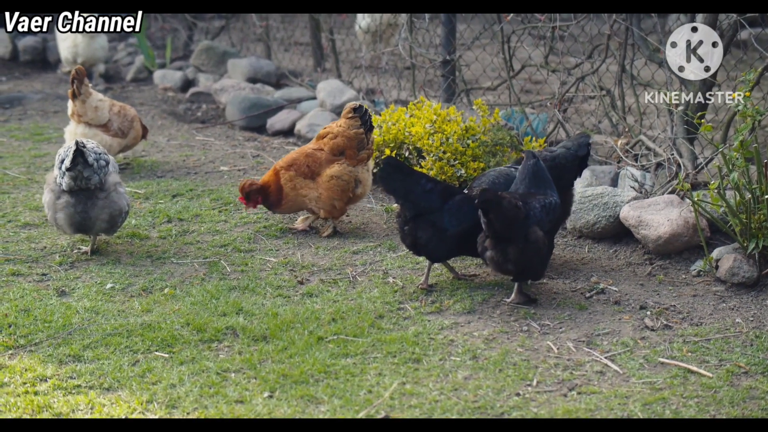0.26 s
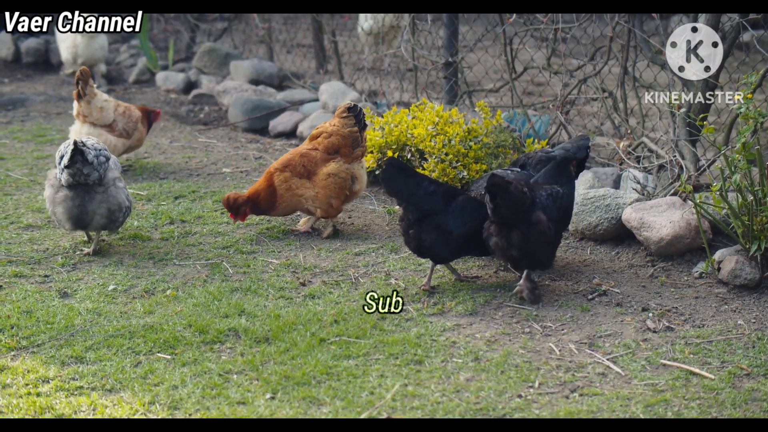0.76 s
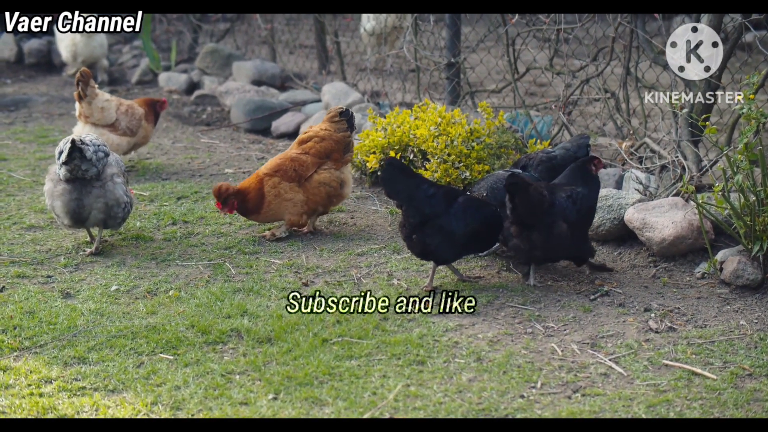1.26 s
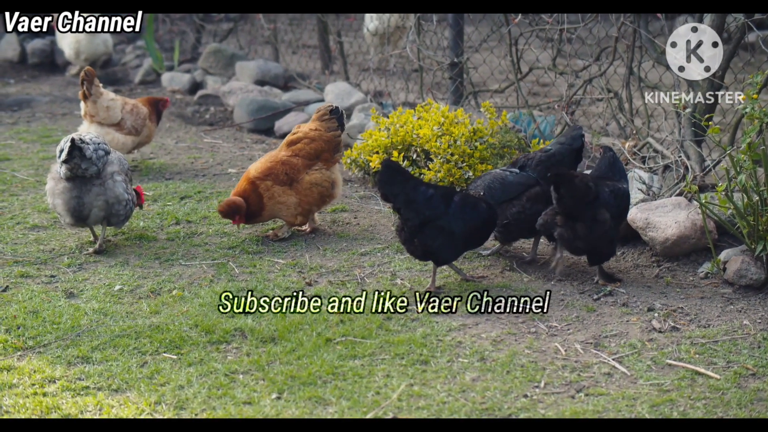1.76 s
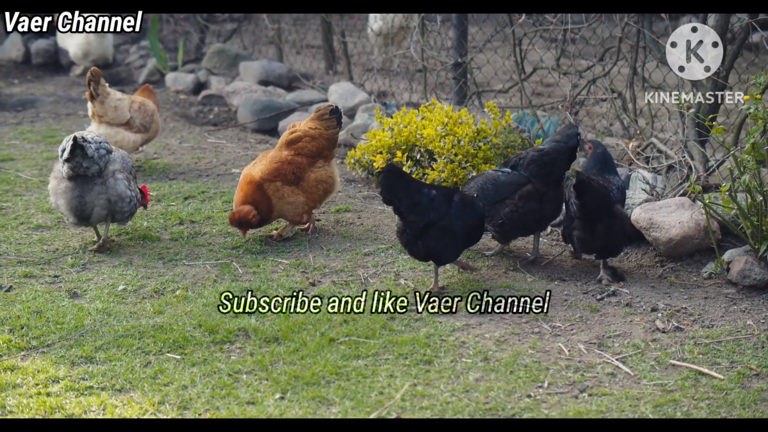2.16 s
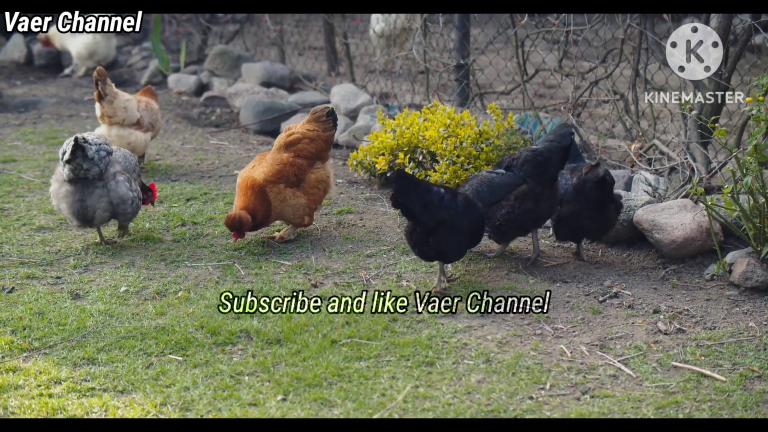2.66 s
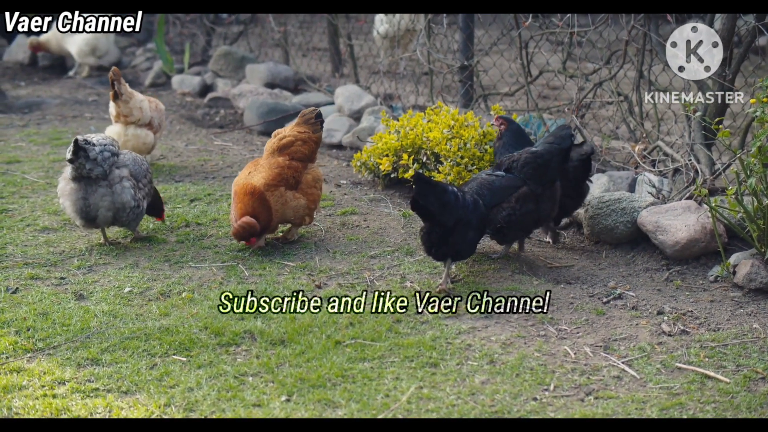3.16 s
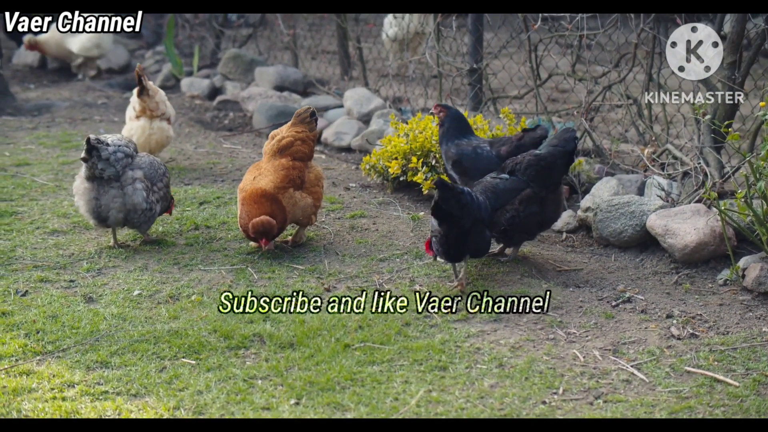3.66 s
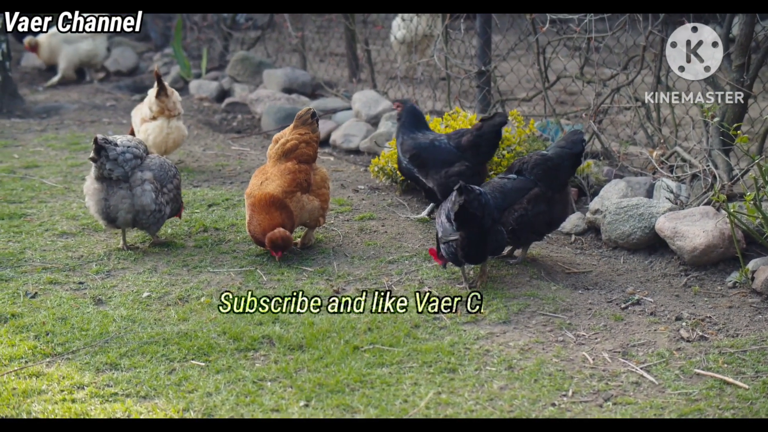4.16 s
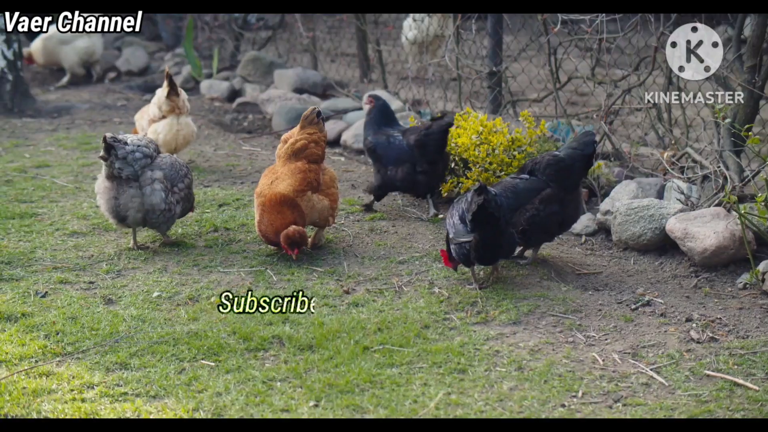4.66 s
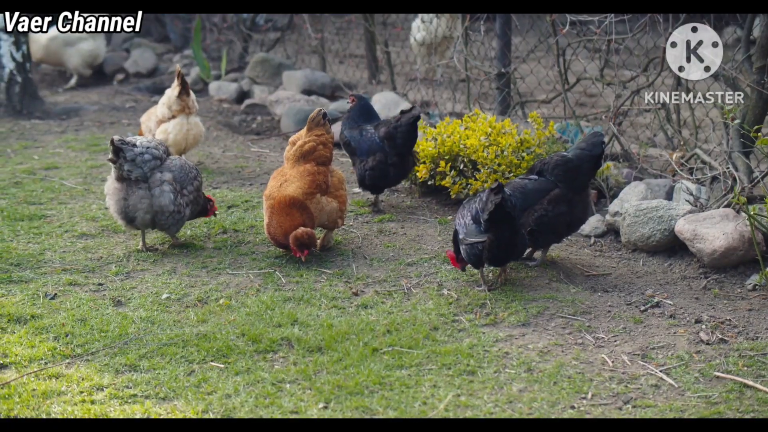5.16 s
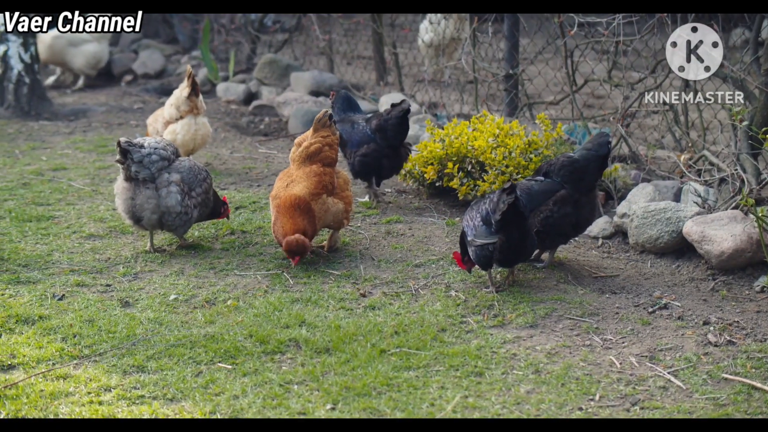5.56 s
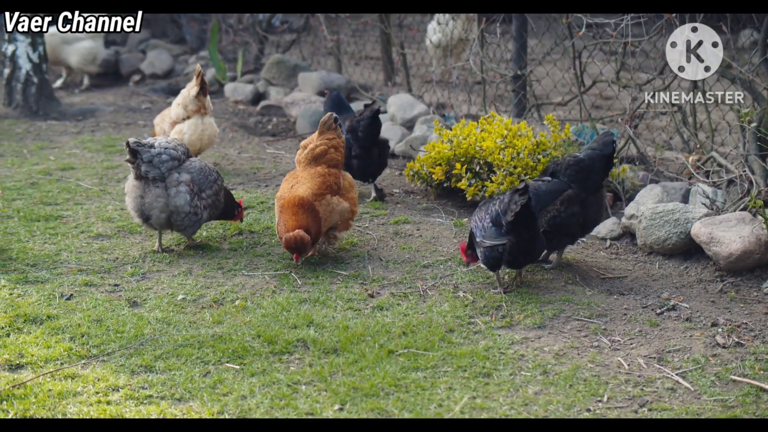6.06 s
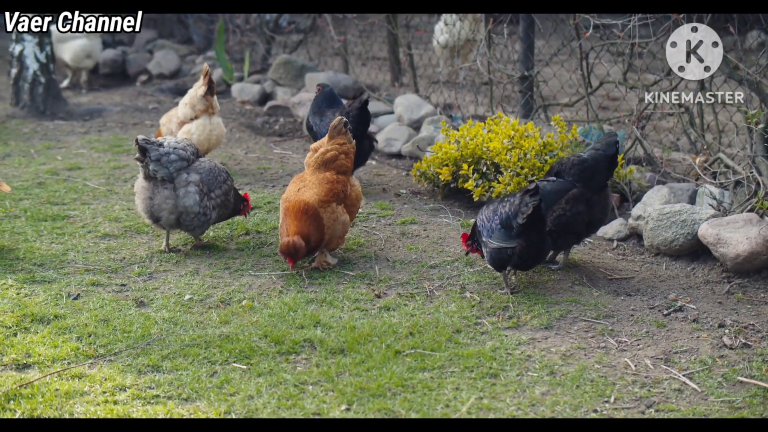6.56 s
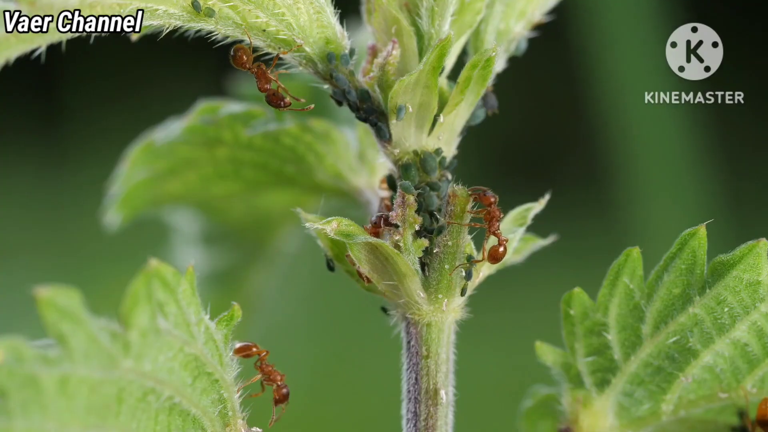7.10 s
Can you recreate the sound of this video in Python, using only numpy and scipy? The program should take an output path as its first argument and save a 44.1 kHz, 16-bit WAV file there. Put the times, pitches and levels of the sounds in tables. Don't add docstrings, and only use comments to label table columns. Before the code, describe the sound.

Outdoors in a reverberant yard, one hen opens on a loud squawk, then gives spaced hoarse clucks and two more runs that climb to clear, distorted squawks. A far engine hums low, songbirds whistle and chatter faintly, feet thud and scratch. After a tiny silence the scene switches to insects crackling very close in dry litter, with sharp little snaps.

```python
import sys
import numpy as np
from scipy import signal
from scipy.io import wavfile
from scipy.ndimage import uniform_filter1d

SR = 44100
rng = np.random.default_rng(int(sys.argv[2]) if len(sys.argv) > 2 else 0)


def amp(db):
    return 10 ** (np.asarray(db, float) / 20)


def write(x):
    x = np.atleast_2d(x).T
    wavfile.write(sys.argv[1], SR, np.round(np.clip(x, -1, 1) * 32767).astype(np.int16))


N = 323253


def evened(x):
    return x / np.sqrt(np.mean(x ** 2) + 1e-20)


def read(points, hz):
    f, value = np.transpose(points)
    return np.interp(np.log(hz + 1), np.log(f + 1), value)


def along(rows):
    return np.interp(np.arange(N) / SR, *np.transpose(rows))


def add(mix, s, sound):
    part = mix[round(s * SR):][:len(sound)]
    part += sound[:len(part)]


def resonate(x, hz, width):
    r = np.exp(-np.pi * width / SR)
    return 2 * signal.lfilter([1 - r], [1, -r * np.exp(2j * np.pi * hz / SR)], x).real


def body(x, modes):
    out = 0
    for k, (hz, width, db) in enumerate(modes):
        out = out + (-1) ** k * amp(db) * resonate(resonate(x, hz, width), hz, width)
    return out


def wander(count, hz):
    settle = 4000
    grit = rng.standard_normal(count + settle)
    return evened(signal.lfilter(*signal.butter(2, hz, fs=SR), grit)[settle:])


def noise(spectrum, patchy_db):
    frames, hz = N // 256 + 5, np.fft.rfftfreq(1024, 1 / SR)
    a, b, patches = rng.standard_normal((frames, 513, 3)).T
    patches = evened(uniform_filter1d(uniform_filter1d(patches, 10, 0), 12, 1))
    z = (a + 1j * b) * amp(read(spectrum, hz)[:, None] + patchy_db * patches)
    return evened(signal.istft(z, nperseg=1024, noverlap=768)[1][:N])


def bursts(table, rise_share):
    out, t = np.zeros(N), np.arange(SR // 2) / SR
    for s, db, hz, width, t60 in table:
        rise = rise_share * t60
        grit = rng.standard_normal(len(t))
        grit = evened(resonate(resonate(grit, hz, width), hz, width))
        decay = amp(db - 60 * np.maximum(t - rise, 0) / t60)
        add(out, s, decay * np.minimum(t / rise, 1) * grit)
    return out


# (time [s], level [dB])
DRONE_LEVEL = [(0.0, -40), (0.15, -40.5), (2.15, -39), (2.56, -43), (3.43, -39.5), (3.49, -47.5),
               (3.91, -46), (4.01, -35), (4.17, -47.5), (5.12, -48.5), (5.6, -40), (5.97, -50.5),
               (6.45, -40), (6.66, -45)]
ORDER_LEVELS = [-12.5, -9.5, 0.5, 0.5, -27.5, -14, -16, -11.5]
# (frequency [Hz], density [dB per Hz])
RUMBLE_SPECTRUM = [(12, -44), (20, -6), (70, 0.5), (139, -9.5), (271, -25.5), (352, -20), (659, -26.5),
                   (1030, -25.5), (2500, -37.5), (3250, -72.5), (5500, -120)]


def engine():
    firing_hz, blur_hz, rumble_db = 35.1, 12.0, -3.5
    orders = 0
    for k, db in enumerate(ORDER_LEVELS):
        partial = resonate(rng.standard_normal(N), (k + 1) * firing_hz, blur_hz)
        orders = orders + amp(db) * evened(partial)
    orders = signal.sosfilt(signal.butter(2, 320, fs=SR, output="sos"), orders)
    rumble = amp(rumble_db) * noise(RUMBLE_SPECTRUM, 1.7)
    return amp(along(DRONE_LEVEL)) * evened(evened(orders) + rumble)


# (frequency [Hz], density [dB per Hz])
WIND_SPECTRUM = [(15, -4), (40, -0.5), (120, -5.5), (300, -21.5), (1000, -43)]


def wind():
    return amp(-55.5) * noise(WIND_SPECTRUM, 2.3) * np.array([[1], [0]])


# (frequency [Hz], density [dB per Hz])
AIR_SPECTRUM = [(180, -28.5), (300, -11.5), (928, -14.5), (1660, -26.5), (3000, -22), (3280, -23.5),
                (5690, -22), (6500, -24.5), (10500, -29.5), (13600, -57), (22000, -120)]
# (time [s], level [dB])
AIR_SWELL_LEVEL = [(0, 2), (.9, 6), (2.5, 3), (3.9, 4), (4.8, 1), (5.3, 5.5), (6.1, 8), (6.68, 5.5)]


def open_air(opening):
    air_db = -70
    air = amp(air_db + along(AIR_SWELL_LEVEL)) * noise(AIR_SPECTRUM, 1.3)
    bright = amp(12.0) * opening * resonate(air, 3400, 3300)
    side = amp(air_db + 5.5) * noise(AIR_SPECTRUM, 1.5)
    return air + bright + side * np.array([[1], [-1]])


# (time [s], level [dB], centre [Hz], width [Hz], t60 [s])
FOOT_KNOCKS = [
    (.314, -36, 510, 598, 0.31),
    (.314, -42.5, 1790, 836, 0.22),
    (3.974, -34.5, 218.8, 509.4, 0.24),
    (3.975, -53, 2500, 2850, .2),
    (4.908, -57.5, 6050, 3500, .15),
    (5.035, -71, 5000, 2470, .03),
]
# (time [s], level [dB], centre [Hz], width [Hz], t60 [s])
CLAW_SCRATCHES = [
    (.45, -59, 5500, 2500, .35),
    (2.36, -52.5, 1010, 860, 1.1),
    (3.83, -47, 3600, 700, 0.48),
    (3.89, -53, 3880, 700, .27),
    (6.419, -51, 278.7, 193.4, 0.55),
    (6.42, -59.5, 1200, 498, 1.4),
    (6.61, -58.5, 6000, 3080, .62),
]
KNOCK_RISE, SCRATCH_RISE = 0.024, 0.072


def feet():
    return bursts(FOOT_KNOCKS, KNOCK_RISE) + bursts(CLAW_SCRATCHES, SCRATCH_RISE)


# (frequency [Hz], t60 [s])
YARD_DECAY = [(400, 0.47), (750, 0.46), (1060, 0.37), (1500, 0.43), (2790, 0.25), (7350, 0.32)]


def yard(x):
    echo_db, width_db = -11.5, -22
    taps = np.zeros((2, SR // 2))
    slots = np.arange(300, SR // 2 - 20, 20)
    at = slots + rng.integers(0, 20, (2, len(slots)))
    np.put_along_axis(taps, at, rng.choice([-1., 1.], at.shape), 1)
    hz, t, z = signal.stft(taps, SR, nperseg=256)
    decay = amp(-60 * t / read(YARD_DECAY, hz)[:, None])
    tail = signal.istft(z * decay, SR, nperseg=256)[1]
    stirred = x * (1 + .4 * wander(N, 60))
    mid, side = signal.fftconvolve(stirred[None], tail / np.linalg.norm(tail[0]), axes=1)[:, :N]
    return amp(echo_db) * (mid + amp(width_db) * side * np.array([[1], [-1]]))


# (start [s], end [s], first frequency [Hz], last frequency [Hz], level [dB])
BIRD_NOTES = [(0.693, 0.95, 5500, 3910, -65.5), (0.937, 1.071, 3950, 3250, -47),
              (1.056, 1.214, 3190, 2700, -57), (2.032, 2.12, 2240, 2400, -43),
              (2.608, 2.653, 2220, 2750, -57.5), (2.639, 2.686, 2260, 1980, -50.5),
              (2.67, 2.75, 2060, 2047, -51.5), (2.791, 2.832, 3040, 2400, -51.5),
              (2.839, 2.866, 3960, 2400, -46), (4.896, 5.015, 2820, 3230, -70),
              (4.998, 5.083, 3250, 2830, -72.5)]
# (start [s], first frequency [Hz], level [dB])
BIRD_CHIPS = [
    (2.342, 2456, -49.5),
    (2.375, 2400, -50),
    (2.403, 2910, -46),
    (2.423, 2645, -46),
    (2.45, 2520, -54),
    (2.466, 2850, -44),
    (2.488, 2290, -57),
    (2.508, 2550, -47.5),
    (2.529, 2440, -55),
]


def songbirds():
    blur, echo_db, chip_s, chip_fall, trees_t60 = 0.0056, -4.5, .019, .85, .15
    chips = [(s, s + chip_s, hz, hz * chip_fall, db) for s, hz, db in BIRD_CHIPS]
    out = np.zeros(N)
    for start, end, first_hz, last_hz, db in list(BIRD_NOTES) + chips:
        count = round((end - start) * SR)
        hz = np.linspace(first_hz, last_hz, count) * (1 + blur * wander(count, 60))
        whistle = np.sin(2 * np.pi * np.cumsum(hz) / SR) * signal.windows.tukey(count, .7)
        add(out, start, amp(db + 2.2 * wander(count, 50)) * whistle)
    trees = rng.standard_normal(6000) * amp(-60 * np.arange(6000) / SR / trees_t60)
    return out + amp(echo_db) * signal.oaconvolve(out, trees / np.linalg.norm(trees))[:N]


# (frequency [Hz], width [Hz], level [dB])
SHUT_THROAT = [
    [(336, 120, -15), (510, 150, -34), (953, 220, -3), (1200, 240, -0.5), (1463, 280, 1.5),
     (1540, 890, -13), (1752, 100, 0.5), (2050, 310, -23.5)],
    [(2480, 680, 2), (3080, 470, -1)],
    [(4690, 1300, -1), (6020, 770, -7), (6850, 640, -15), (9400, 850, -11.5)],
]
# (frequency [Hz], width [Hz], level [dB])
OPEN_THROAT = [
    [(724.5, 440, -16.5), (1385, 350, 1)],
    [(2090, 400, -10.5), (2750, 350, 0.5)],
    [(3530, 570, -1), (4250, 1400, -2), (5660, 790, -4.5), (6850, 1400, -8.5), (8880, 1400, -12.5)],
]
# (frequency [Hz], width [Hz])
BEAK_HOLLOWS = [(3850, 300), (6750, 700)]


def call(rows):
    jitter, shimmer_db, flicker_db, breath, hiss = .15, 5., 2.2, 1.3, 1.9
    s, *controls = np.transpose(sorted(rows))
    t = np.arange(s[0], s[-1], 1 / SR)
    effort_db, hz, rough, shrill = (np.interp(t, s, c) for c in controls)
    ring_db, treble_db = -31.5 + 35 * shrill, -25. + 21 * shrill
    beak = np.clip((hz - 580) / 100, 0, 1)
    treble_db = treble_db + beak * (7.5 + 31.5 * (t - t[-1]))
    halves = .4 * rough * (1 - beak)
    rough = np.clip(rough, 0, 1)
    turns = np.cumsum(hz * (1 + jitter * rough ** 2 * wander(len(t), 120))) / SR
    pulses = 0
    for k in range(1, 17):
        flicker = amp(flicker_db * np.sqrt(k) * wander(len(t), 24))
        pulses = pulses + flicker * np.cos(2 * np.pi * k * turns)
    shimmer = amp(shimmer_db * rough * np.tanh(wander(len(t), 230)))
    pulses = evened(pulses) * shimmer * (1 + 2 * halves * np.cos(np.pi * turns))
    puffs = evened((.7 + np.exp(-(turns % 1) / .3)) * rng.standard_normal(len(t)))
    out = 0
    group_db, group_air = (0, ring_db, treble_db), (breath * rough, hiss, 2 * hiss)
    for shut, wide, db, air in zip(SHUT_THROAT, OPEN_THROAT, group_db, group_air):
        drive = pulses + air * np.maximum(rough - .07, 0) * puffs
        closed = body(drive, shut)
        closed = closed - sum(.95 * resonate(closed, f, width) for f, width in BEAK_HOLLOWS)
        part = (1 - beak) * closed + beak * body(drive, wide)
        power = abs(uniform_filter1d(part ** 2, size=1100, mode="reflect"))
        out = out + amp(db) * part / np.sqrt(power + 1e-9)
    fade_s = .012
    fade_in = t - t[0] + fade_s * (t[0] < .01)
    edge = np.minimum(np.minimum(fade_in, t[-1] - t) / fade_s, 1)
    throb_db = 4 * np.sqrt(rough) * np.tanh(wander(len(t), 60))
    return s[0], amp(effort_db + throb_db) * out * edge


def cluck(start, length, peak_db, hz, shrill, hoarse=1):
    sharp, rise_s, fall_db, end_rough = 1.06, .022, -12.5, .45
    end_shrill = shrill + 0.12
    settle_s = max(length - .024, rise_s + .004)
    return [(start, peak_db - 15.5, hz * sharp, .75, shrill - 0.065),
            (start + rise_s, peak_db, hz * np.sqrt(sharp), hoarse * .58, shrill),
            (start + settle_s, peak_db - 2, hz, hoarse * end_rough, shrill + 0.06),
            (start + length - .006, peak_db + fall_db, hz, end_rough, end_shrill),
            (start + length + .05, peak_db + fall_db - 15.5, hz, .8, end_shrill + 0.034)]


def squawk(rows, close_hz):
    break_s, close_s, close_db = .012, .07, -15
    s, db, _, _, shrill = rows[-1]
    return list(rows) + [(s + break_s, db + close_db * break_s / close_s, close_hz, .45, shrill),
                         (s + close_s, db + close_db, close_hz, .75, shrill - 0.14)]


# (start [s], length [s], peak effort [dB], settled pitch [Hz], shrillness [0-1])
PLAIN_CLUCKS = [
    (0.954, 0.043, -14.5, 392.3, .0),
    (1.216, 0.066, -12, 505.8, 0.28),
    (1.46, 0.071, -12.5, 504, .36),
    (1.788, 0.074, -11, 506.4, .32),
    (2.087, .074, -11.5, 504.7, .3),
    (2.893, .067, -12, 499, .4),
    (3.112, .072, -12.5, 509.5, .3),
]
# (start [s], length [s], peak effort [dB], settled pitch [Hz], shrillness [0-1])
TENSE_CLUCKS = [
    (3.32, .084, -9, 503, 0.35),
    (5.326, .048, -7, 508, .33),
    (5.533, .09, -11.5, 510, .35),
]
# (time [s], effort [dB], pitch [Hz], roughness [0-1], shrillness [0-1])
FIRST_SQUAWK = [
    (0, -1, 694, 0.23, 0.19),
    (.026, -6.5, 703.7, 0.16, 0.15),
    (.062, -7, 716.7, .22, 0.4),
    (.088, -10.5, 700, 0.39, 0.53),
]
SECOND_SQUAWK = [
    (3.392, -18.5, 509.2, 0.56, 0.55),
    (3.441, -14, 519, 0.75, .6),
    (3.457, -8, 717, .4, .62),
    (3.521, -6.5, 692.3, 0.19, .4),
    (3.533, -17.5, 667.4, 0.081, 1),
    (3.615, -20.5, 670.7, .05, 0.89),
    (3.636, -4.5, 694.8, .15, 0.36),
    (3.657, -12.5, 720, .3, .62),
]
THIRD_SQUAWK = [
    (5.61, -18.5, 514.3, .5, 0.36),
    (5.635, -10.5, 588.8, .35, 0.47),
    (5.69, -11.5, 681.6, .4, .55),
    (5.715, -2, 709, .22, 0.45),
    (5.773, -10, 699.2, .05, 0.52),
    (5.793, -17, 682, .05, .6),
    (5.872, -26, 675.2, .06, .9),
    (5.884, -3, 701, .2, .42),
    (5.902, -11.5, 687.6, .48, .5),
]
BREAK_PITCHES = [615, 545, 555]


def hen():
    tense_rough = .42
    calls = [cluck(*row) for row in PLAIN_CLUCKS]
    calls += [cluck(*row, tense_rough) for row in TENSE_CLUCKS]
    calls += map(squawk, (FIRST_SQUAWK, SECOND_SQUAWK, THIRD_SQUAWK), BREAK_PITCHES)
    out = np.zeros(N)
    for rows in calls:
        add(out, *call(rows))
    return out


def background_opening(voice):
    power = uniform_filter1d(uniform_filter1d(voice ** 2, size=5000), size=5000)
    return np.tanh(np.sqrt(abs(power)) / 0.093)


# (frequency [Hz], density [dB per Hz])
HUSH_SPECTRUM = [(15, -41.5), (25, -14), (684, -15.5), (1250, -22), (1880, -17.5), (2420, -25.5),
                 (3910, -7.5), (5290, -35), (7340, -21), (10500, -40), (13600, -80), (22000, -120)]


def litter_hush():
    return amp(-58.5) * noise(HUSH_SPECTRUM, 4.5)


# (time [s], level [dB])
BUSTLE_LEVEL = [
    (6.711, -62),
    (6.815, -55),
    (6.865, -54.5),
    (6.907, -40),
    (6.935, -58.5),
    (7.165, -43.5),
    (7.255, -57.5),
    (7.265, -41),
    (7.33, -33),
]
# (frequency [Hz], width [Hz], level [dB])
LEAF_MODES = [(2400, 1200, -15), (3500, 900, -1), (4050, 900, 3), (5000, 800, -13), (6350, 1400, -8.5),
              (7560, 630, -12.5)]


def crackle():
    per_s, spread_db = 3000., 4.0
    sizes = amp(spread_db * np.minimum(rng.exponential(1, N), 5))
    clicks = sizes * (rng.random(N) < per_s / SR) * rng.choice([-1, 1], N)
    return amp(along(BUSTLE_LEVEL) - 1.0) * evened(body(clicks, LEAF_MODES))


# (time [s], peak level [dB], frequency [Hz])
LEAF_SNAPS = [(6.7568, -41, 3740), (6.7872, -32.5, 3870), (6.8137, -46, 3840), (6.8551, -41, 4110),
              (6.8711, -33.5, 3770), (6.903, -35, 4130), (6.901, -26, 3860), (6.9713, -39, 4250),
              (6.9943, -42.5, 4057), (7.034, -27.5, 4250), (7.0397, -36, 3980), (7.0826, -38, 3960),
              (7.0945, -28, 3990), (7.1102, -31, 3920), (7.1374, -38, 3640), (7.1604, -22, 4100),
              (7.2128, -31, 3900), (7.2607, -30, 4060), (7.2716, -41, 4000), (7.2969, -21.5, 4050),
              (7.3051, -21, 4100)]


def snaps():
    out, t = np.zeros(N), np.arange(2000) / SR
    for s, db, hz in LEAF_SNAPS:
        burst = rng.standard_normal(len(t)) * amp(-60 * t / 0.02)
        ring = resonate(resonate(burst, hz, 900.), hz, 900.) + .5 * body(burst, LEAF_MODES)
        add(out, s, amp(db - 3.0) * ring / abs(ring).max())
    return out


# (time [s], level [dB], centre [Hz], width [Hz], t60 [s])
LITTER_BUMPS = [
    (6.8, -62, 59.8, 149.4, .57),
    (6.9, -68, 79, 194, 0.26),
    (7.06, -57.5, 89, 251, 0.323),
    (7.2, -54, 874, 500, .16),
]


def litter_bumps():
    return bursts(LITTER_BUMPS, 2 * KNOCK_RISE)


def scene():
    yard_end_s, litter_start_s = 6.683, 6.711
    voice = hen()
    opening = background_opening(voice)
    near = voice + feet() + songbirds()
    drone = amp(3. * opening) * engine() * amp(np.array([[.4], [-.4]]))
    outdoors = near + yard(near) + drone + wind() + open_air(opening)
    leaves = litter_hush() + crackle() + snaps() + litter_bumps()
    t = np.arange(N) / SR
    yard_gate = np.clip((yard_end_s - t) / .003, 0, 1)
    litter_gate = np.clip((t - litter_start_s) / 0.0032, 0, 1)
    return outdoors * yard_gate + leaves * litter_gate


def top_cut(x):
    return signal.sosfilt(signal.butter(12, 10610, fs=SR, output="sos"), x)


def record(dry):
    smear_db, edge_hz, top_hz = -17, 10800, 15800
    z = signal.stft(dry.mean(0), nperseg=4096)[2]
    spread = uniform_filter1d(abs(z), size=80, axis=0)
    random_phase = np.exp(2j * np.pi * rng.random(z.shape))
    smear = signal.istft(spread * random_phase, nperseg=4096)[1][:N]
    smeared = dry + amp(smear_db) * smear * (dry != 0)
    edge = signal.firwin(301, edge_hz, window=("kaiser", 9), fs=SR)
    top = signal.firwin(301, top_hz, window=("kaiser", 9), fs=SR)
    clipped = np.clip(signal.oaconvolve(smeared, edge[None], "same"), -1, 1)
    mix = np.clip(signal.oaconvolve(clipped, top[None], "same"), -1, 1)
    return top_cut(mix)


dry = scene()
out = record(dry)
write(out)
```